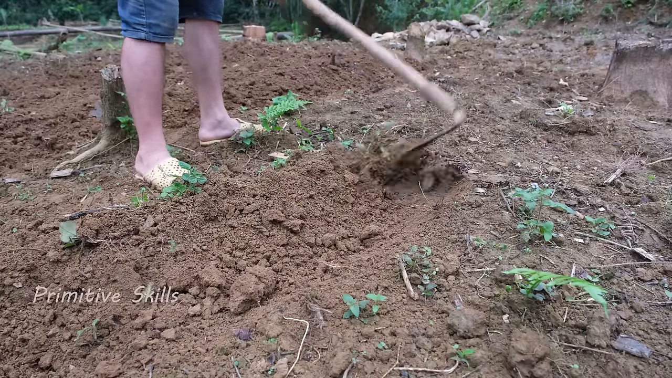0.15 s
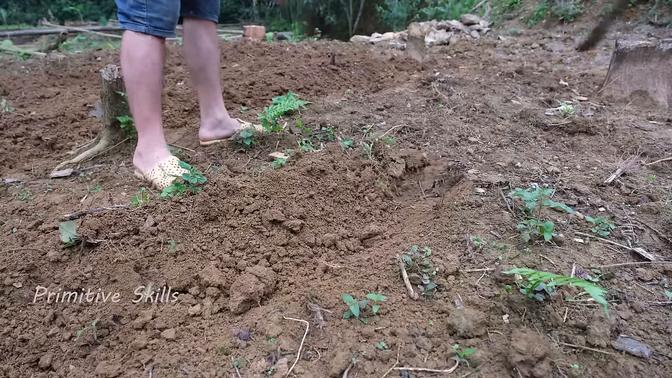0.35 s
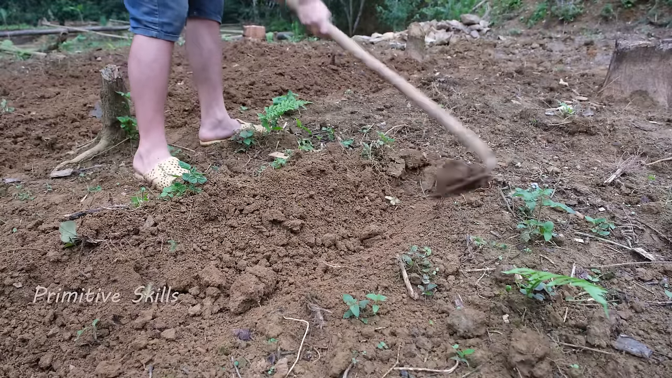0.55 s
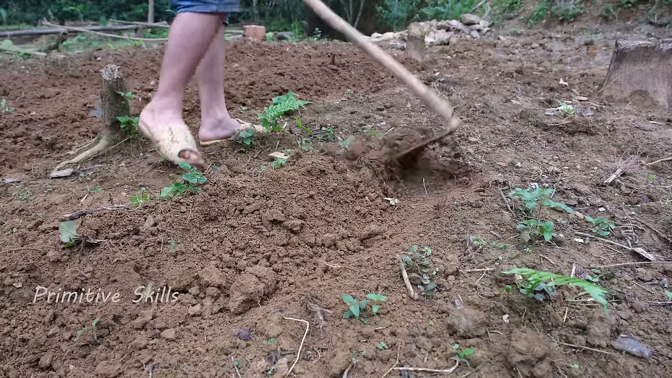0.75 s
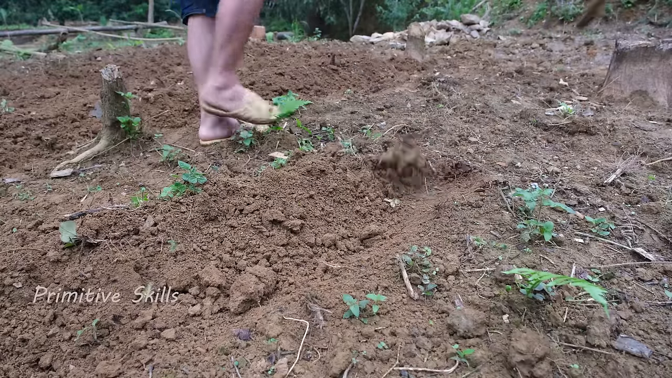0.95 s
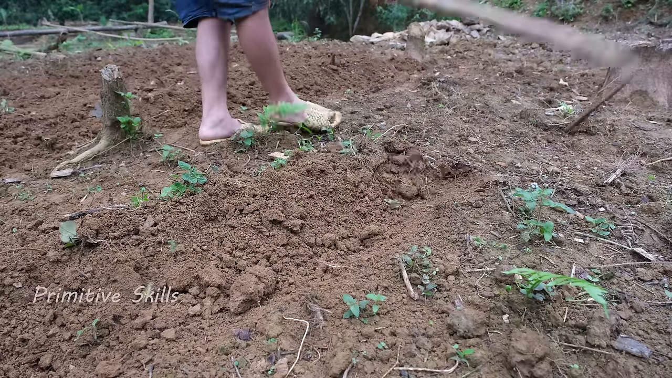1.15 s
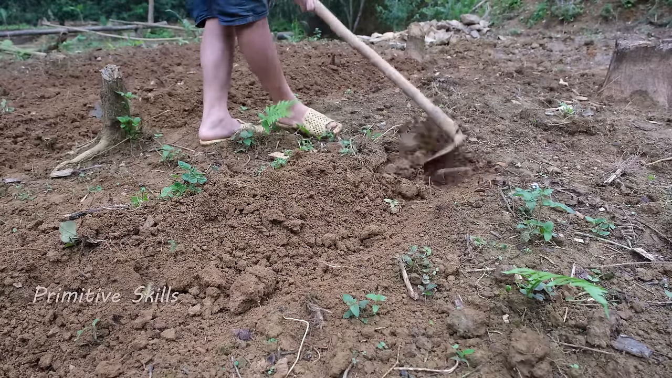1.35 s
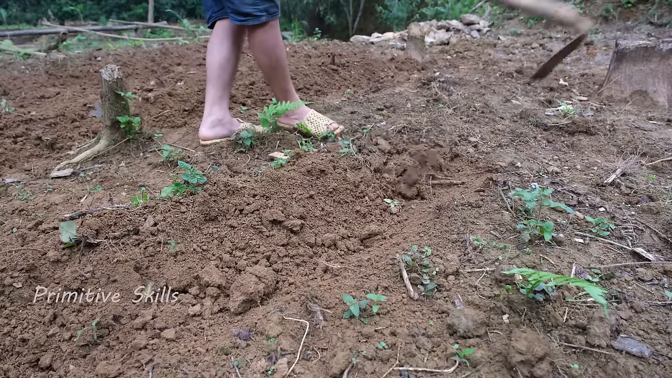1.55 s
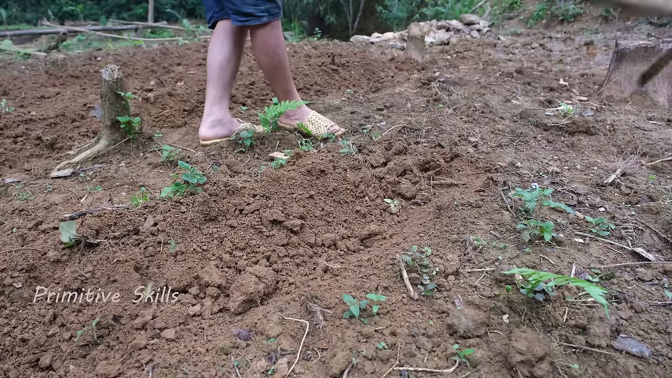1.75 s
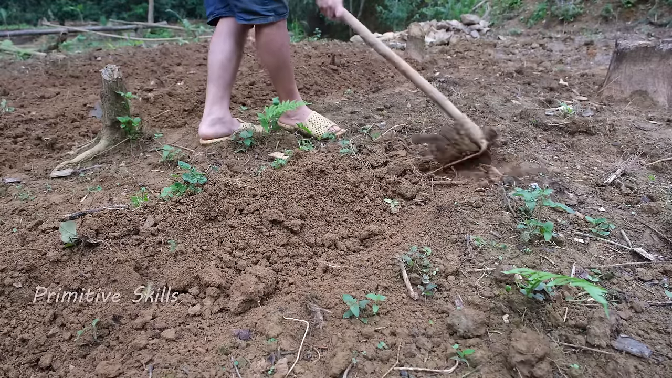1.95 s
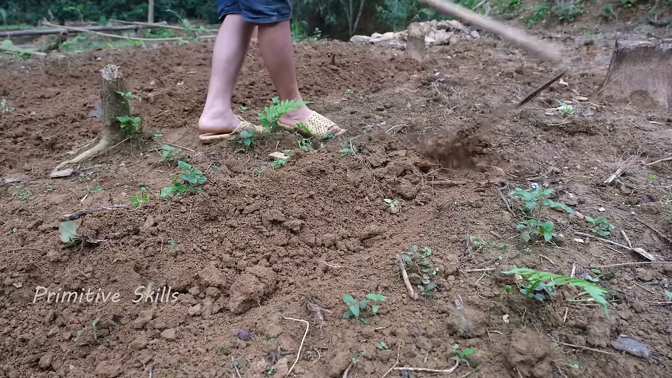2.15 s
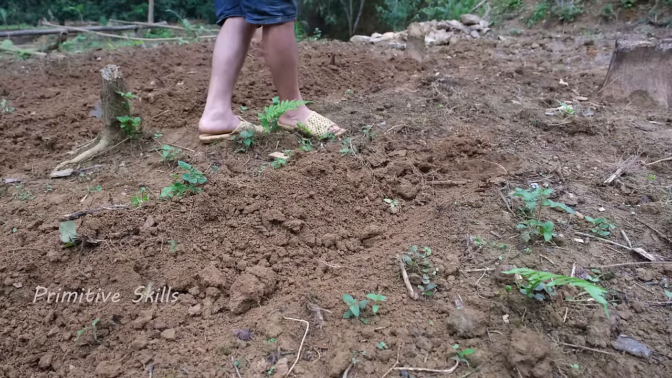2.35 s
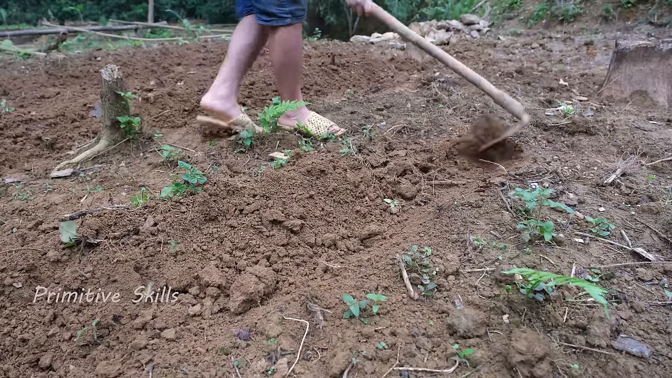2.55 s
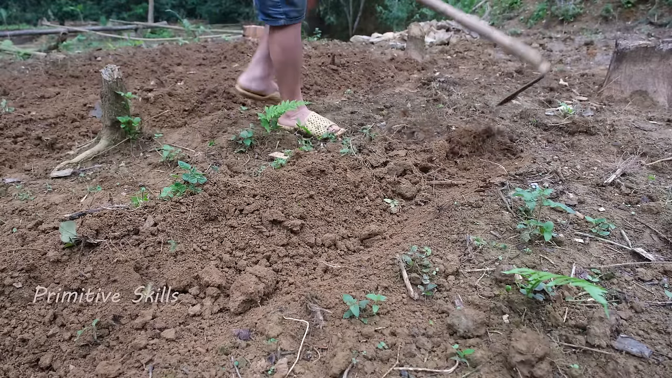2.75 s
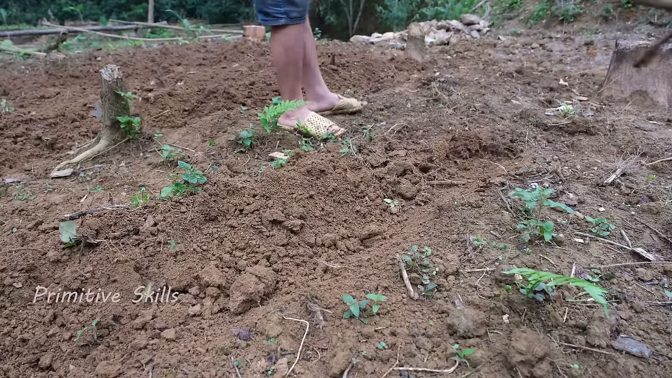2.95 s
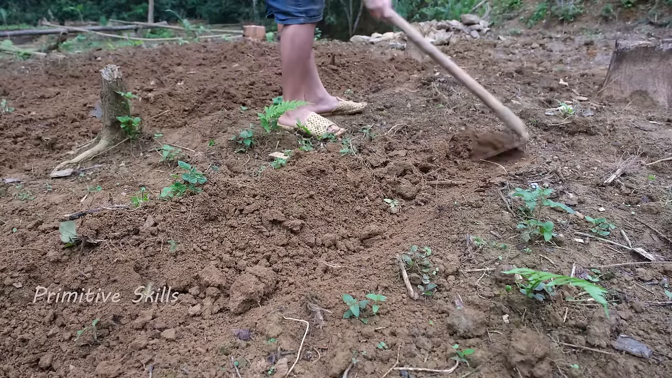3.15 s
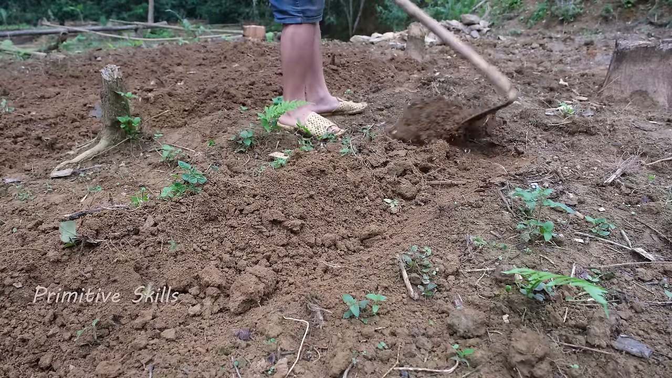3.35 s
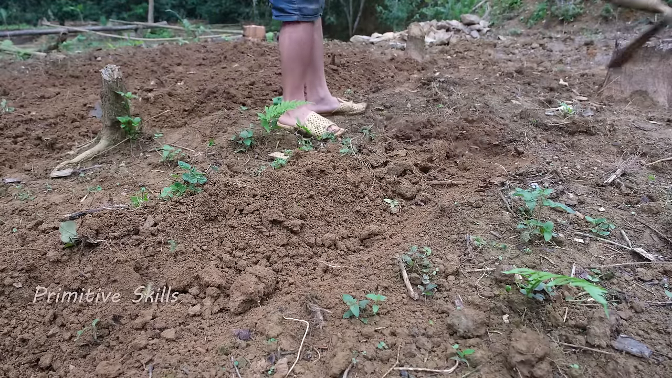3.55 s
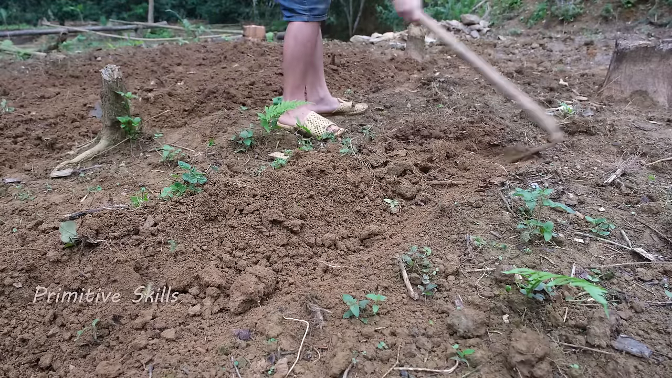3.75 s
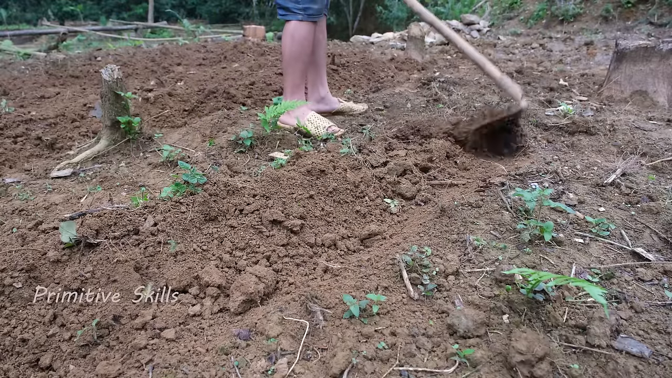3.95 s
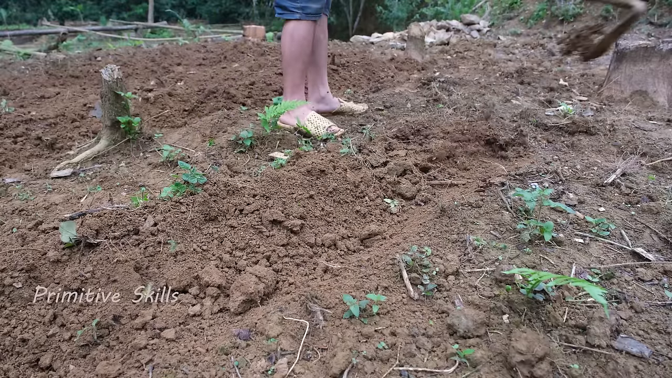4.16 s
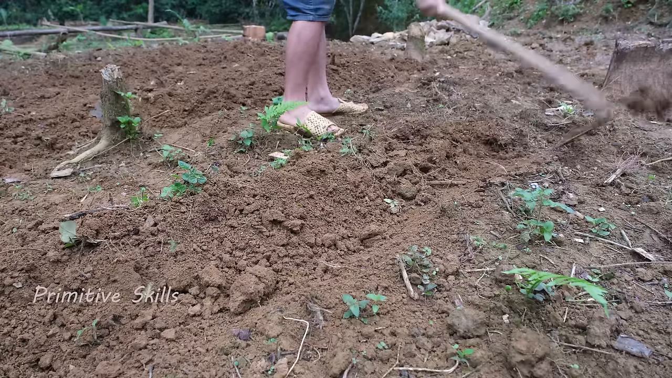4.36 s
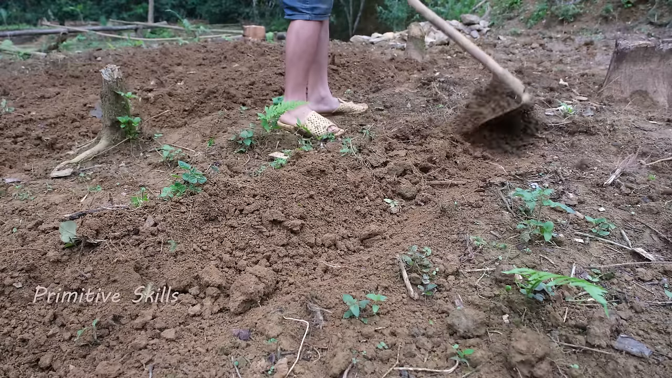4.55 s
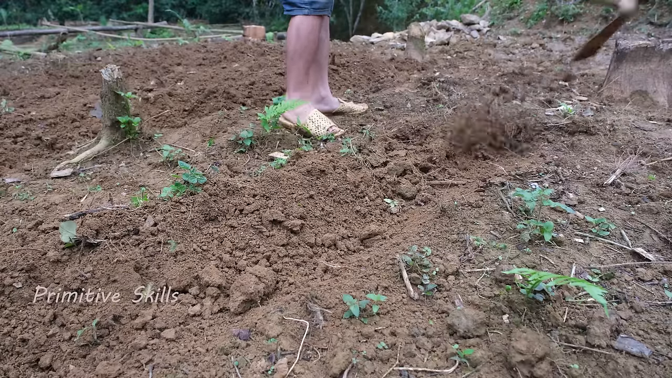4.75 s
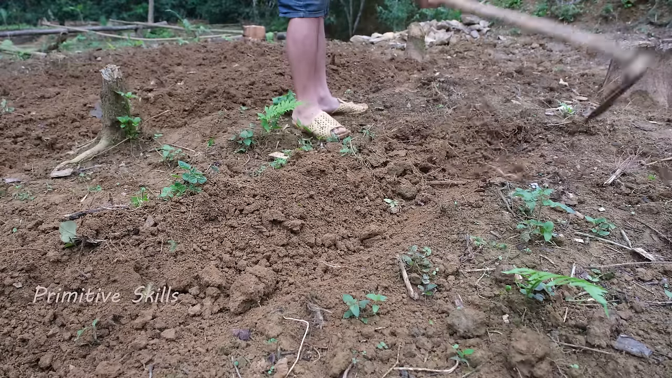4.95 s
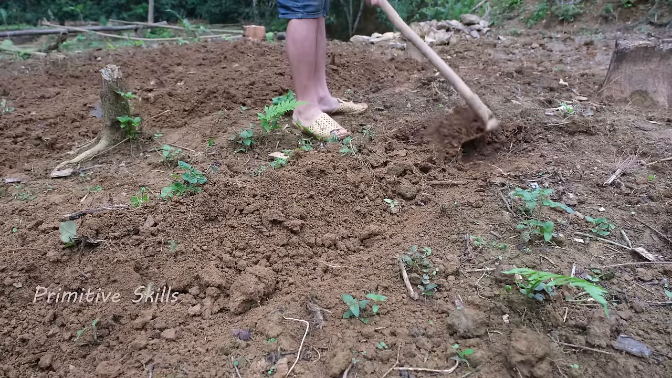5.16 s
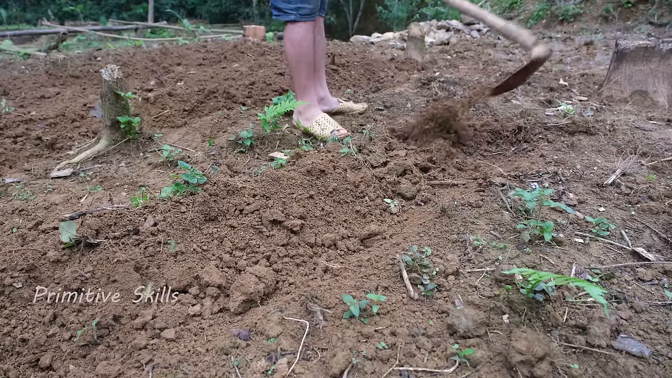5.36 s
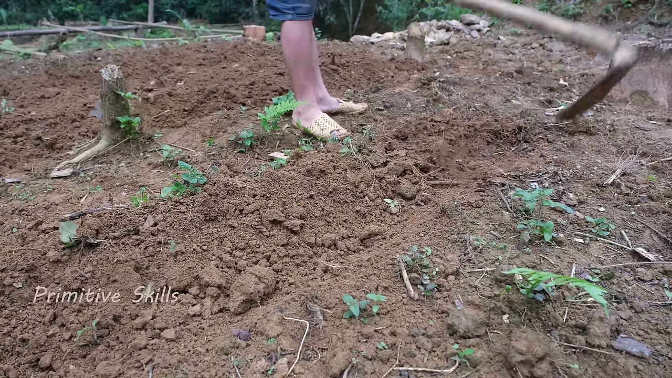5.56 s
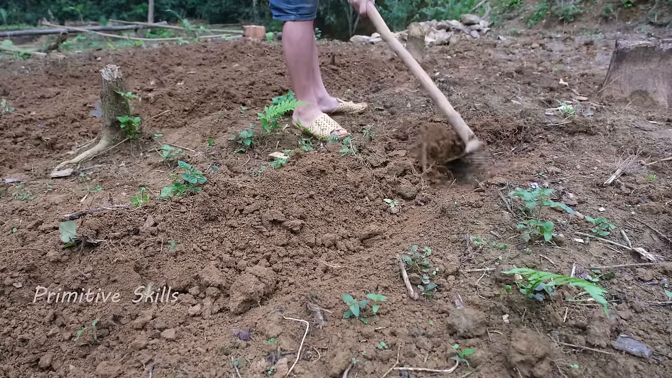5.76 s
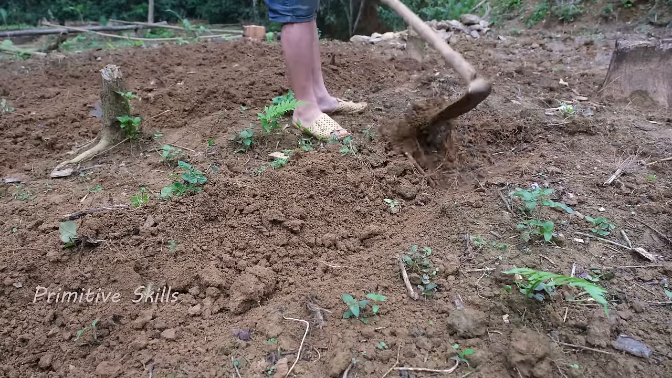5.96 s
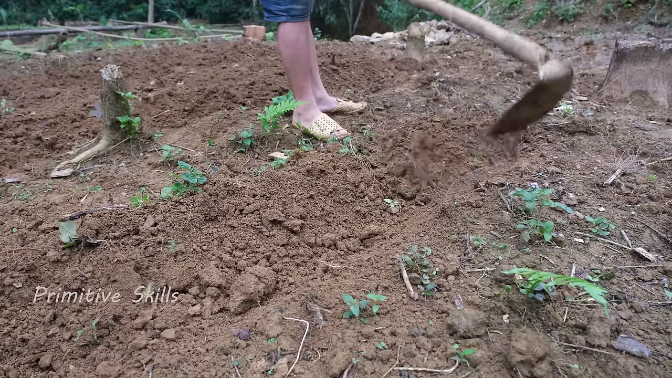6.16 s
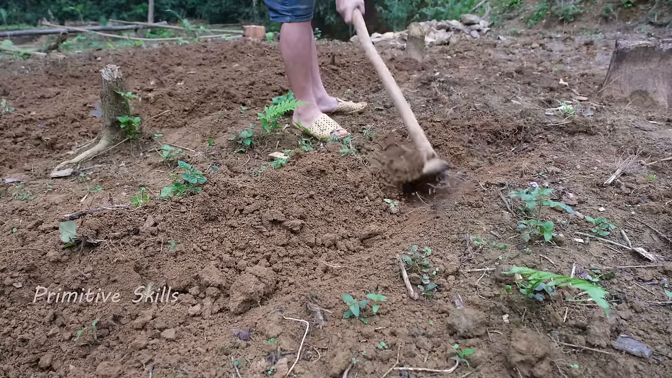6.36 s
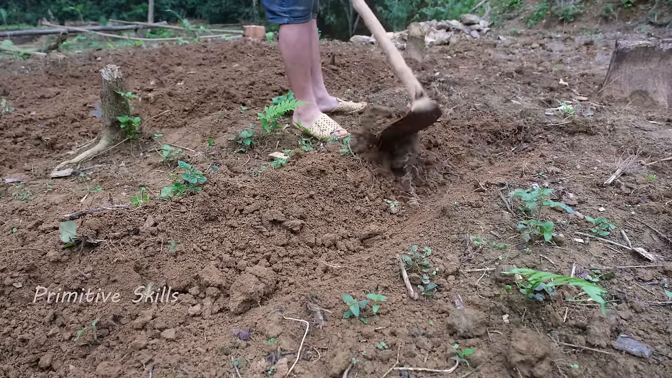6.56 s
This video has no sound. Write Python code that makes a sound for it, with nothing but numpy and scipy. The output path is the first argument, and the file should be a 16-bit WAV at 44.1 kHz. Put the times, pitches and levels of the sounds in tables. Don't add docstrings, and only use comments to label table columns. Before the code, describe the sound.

A quiet rural field: faint leaves, running water and insects blur into a soft, steady murmur. At the start, crumbs from an earlier blow settle near the microphone. From about 0.6 seconds a hand hoe chops dry, clumpy earth a few steps away, landing near 0.6, 1.25, 1.9, 2.5, 3.2, 3.8, 4.4, 5.1, 5.7 and 6.3 seconds. Each strike has a brief gritty crunch, cracking clods and a short muffled thud with low ground shudder, then a light patter of pebbles and dirt. The crack at 3.8 is sharpest; those at 2.5 and 5.1 are duller. A small bird trills rapidly and faintly around 2.8 to 3.1, calling weakly again near 6.5. The blade scrapes briefly at 2.0 and 5.8. A stone knocks it hard at 4.46, with a softer knock at 5.17. Dry, centred, with barely any echo.

```python
import sys
import numpy as np
from scipy import signal
from scipy.io import wavfile
from scipy.ndimage import uniform_filter1d

SR = 44100
rng = np.random.default_rng(int(sys.argv[2]) if len(sys.argv) > 2 else 0)


def linear_from_db(decibels):
    return 10 ** (np.asarray(decibels, float) / 20)


def file_out(sig):
    cols = np.atleast_2d(sig).T
    lim = np.clip(cols, -1, 1)
    pcm = np.round(lim * 32767).astype(np.int16)
    wavfile.write(sys.argv[1], SR, pcm)


N = 291060
BURST = 1540


def rms_one(x):
    return x / np.sqrt(np.mean(x ** 2) + 1e-20)


def peak_one(x, size):
    power = uniform_filter1d(x ** 2, size=size, axis=-1)
    return x / np.sqrt(power.max(axis=-1, keepdims=True) + 1e-20)


def band(x, low_hz, high_hz, order=2):
    edges = np.clip([low_hz, high_hz], 10, .45 * SR)
    return signal.sosfilt(signal.butter(order, edges, "band", fs=SR, output="sos"), x)


def resonance(x, hz, width_hz):
    r = np.exp(-np.pi * width_hz / SR)
    turn = 2 * r * np.cos(2 * np.pi * hz / SR)
    return signal.lfilter([(1 - r * r) / 2, 0, (r * r - 1) / 2], [1, -turn, r * r], x)


def drift(rate):
    r = np.exp(-80 * np.pi * rate / SR)
    slow = signal.lfilter([1], [1, -2 * r, r * r], rng.standard_normal(N // 40 + 2002))[2000:]
    return np.interp(np.arange(N) / 40, np.arange(len(slow)), rms_one(slow))


def add(out, start_s, sound):
    i = max(round(start_s * SR), 0)
    out[i:i + len(sound)] += sound[:max(N - i, 0)]


def puffs(rise_s, fall_s, tail_db, tail_s):
    t = np.arange(BURST) / SR
    fall = np.exp(-t / fall_s[:, None]) + linear_from_db(tail_db) * np.exp(-t / tail_s)
    shape = (1 - np.exp(-t / rise_s)) * fall
    return rng.standard_normal(shape.shape) * shape


# (frequency [Hz], density [dB per Hz])
MURMUR = [(30, -51), (105, -10), (185, -6), (290, -4), (500, -8.5), (700, -5.5), (870, -4), (1250, -10.5),
          (2800, -15.5), (3900, -17.5), (5600, -23), (7600, -32.5), (14300, -36), (16500, -45)]


def leaves_and_water(patchy_db, shared_db):
    hz, db = np.transpose(MURMUR)
    edges = 40 * 2 ** np.arange(0, 8.8, 1 / 3)
    white = rng.standard_normal((2, N))
    out, together = 0, drift(3)
    for k, (low, high) in enumerate(zip(edges, edges[1:])):
        level_db = np.interp(np.log(low * high) / 2, np.log(hz), db)
        flicker_db = shared_db * together + patchy_db * drift(22)
        out = out + linear_from_db(level_db + flicker_db) * band(white[k % 2], low, high)
    return linear_from_db(-61.58) * rms_one(out)


# (pitch [Hz], width [Hz], level [dB])
WATER_NOTE = (873, 114, -71.5)


def stream():
    hz, width_hz, level_db = WATER_NOTE
    note = resonance(resonance(rng.standard_normal(N), hz, width_hz), hz, width_hz)
    return linear_from_db(level_db + 2 * drift(5)) * rms_one(note)


def air():
    return linear_from_db(-93.5) * rms_one(band(rng.standard_normal(N), 15, 45))


# (pitch [Hz], width [Hz], level [dB])
STEADY_BAND = (3470, 480, -79)


def steady_band():
    hz, width_hz, level_db = STEADY_BAND
    hush = resonance(resonance(rng.standard_normal(N), hz, width_hz), hz, width_hz)
    return linear_from_db(level_db + drift(3)) * rms_one(hush)


# (time [s], peak [dB])
TRILL_NOTES = [
    (2.7995, -55.5),
    (2.8584, -54),
    (2.9183, -54),
    (2.9776, -54.5),
    (3.039, -54.5),
    (3.0944, -53),
    (3.265, -62),
    (3.33, -62),
    (6.46, -62),
    (6.56, -61),
]
# (time [s], pitch [Hz], level [dB])
CHIRP = [
    (0, 3000, -14),
    (.004, 3450, 0),
    (.009, 3600, -1),
    (.012, 3950, -8),
    (.021, 4250, -17),
]


def bird():
    out, (s, hz, db) = np.zeros(N), np.transpose(CHIRP)
    t = np.arange(round(s[-1] * SR)) / SR
    for (start, peak_db), bend in zip(TRILL_NOTES, rng.normal(1, .01, len(TRILL_NOTES))):
        phase = 2 * np.pi * np.cumsum(bend * np.interp(t, s, hz)) / SR
        note = linear_from_db(peak_db - 2 + np.interp(t, s, db)) * np.sin(phase)
        add(out, start - .004, note)
        add(out, start + .074, linear_from_db(-31) * note)
    decay = np.arange(12000) / SR
    trees = rng.standard_normal(len(decay)) * linear_from_db(-60 * decay / .4)
    return out * linear_from_db(1.2 * drift(150)) + linear_from_db(-36) * signal.fftconvolve(out, trees)[:N]


# (time [s], length [s], patter [dB], fine dust [dB])
SHOWERS = [(0, 0.088, -68, -75), (0.576, 0.1, -60.5, -82), (0.922, 0.21, -68, -75.5),
           (1.271, 0.096, -58, -72), (1.494, 0.18, -72.5, -84), (1.913, 0.11, -64, -78),
           (1.997, 0.091, -62, -72), (2.135, 0.2, -68, -81), (2.54, 0.12, -71, -78), (2.8, 0.17, -70, -88),
           (3.172, 0.13, -69, -79), (3.394, 0.19, -70, -88), (3.798, 0.13, -66.5, -79),
           (4.456, 0.11, -70, -74.5), (5.076, 0.088, -70, -81), (5.706, 0.06, -73, -77),
           (5.769, 0.1, -62.5, -70.5), (6.25, 0.12, -69, -74)]


def loose_dirt():
    sizes = linear_from_db(3.4 * np.minimum(rng.exponential(1, N), 5)) * rng.choice([-1, 1], N)
    grains_per_s = 2400 * linear_from_db(4 * drift(60))
    grains = sizes * (rng.random(N) < grains_per_s / SR)
    dealt = rng.integers(0, 12, N)
    rings = 0
    for k, hz in enumerate(np.geomspace(2200, 5900, 12)):
        rings = rings + resonance(grains * (dealt == k) + 1e-18, hz, .12 * hz)
    patter = band(rings, 2000, 6200)
    dust = band(grains + 2 * rng.standard_normal(N) * grains.std(), 6500, 15500, order=3)
    out = np.zeros(N)
    for start, length_s, patter_db, dust_db in SHOWERS:
        span = slice(max(round(start * SR), 0), round((start + length_s) * SR))
        swell = signal.windows.tukey(span.stop - span.start, .7)
        out[span] += swell * linear_from_db(patter_db) * rms_one(patter[span])
        out[span] += swell * linear_from_db(dust_db) * rms_one(dust[span])
    return out


# (time [s], ground shudder [dB], shudder held [s], first crumb [dB], crumbs fall for [s])
BLOW_EFFECTS = [(-.02, -54, 0.026, -52, 0.037), (.574, -57, 0.079, -45, 0.095),
                (1.253, -55, 0.043, -43.5, .05), (1.893, -60, 0.093, -51, .1),
                (2.526, -58.5, 0.082, -45, .05), (3.165, -59.5, 0.078, -42.5, .04),
                (3.796, -64.5, 0.1, -49.5, .03), (4.428, -65, 0.1, -48.5, .09),
                (5.068, -61, 0.074, -54, 0.033), (5.702, -58, 0.043, -50.5, 0.12),
                (6.333, -60.5, 0.063, -52, 0.033)]


def shudder():
    t, level_db = np.arange(N) / SR, -88
    for s, peak_db, held_s, *_ in BLOW_EFFECTS:
        shape_db = np.interp(t - s, [-.022, 0, held_s, held_s + 1], [-40, .5, 0, -155])
        level_db = np.maximum(level_db, peak_db + shape_db)
    wave = band(resonance(rng.standard_normal(N), 60, 46), 35, 107)
    even = wave / np.sqrt(uniform_filter1d(wave ** 2, size=2400) + 1e-12)
    return 1.3 * resonance(linear_from_db(level_db - 2.9) * even, 61, 80)


# (time [s], length [s], level, 6 dB above that at the
# end [dB], hiss [Hz])
SCRAPES = [
    (2.005, 0.067, -58, 5170),
    (5.785, .063, -57, 4500),
]


def drags():
    swell_db, width_hz = 3, 1500
    out = np.zeros(N)
    grit = rng.standard_normal(N) * linear_from_db(3 * drift(200))
    for s, length_s, level_db, hz in SCRAPES:
        t = np.arange(round(length_s * SR)) / SR
        rub = resonance(grit[round(s * SR):][:len(t)], hz, width_hz)
        rub = resonance(rub, hz, 2 * width_hz)
        swell = linear_from_db(level_db - swell_db * (3 - t / length_s)) * np.minimum(t / .014, 1)
        add(out, s, swell * rms_one(rub))
    return out


# (time [s], peak [dB], pitch [Hz], second pitch [Hz])
STONES = [
    (.7457, -52.5, 2490, 1500),
    (2.0646, -50.5, 2300, 5000),
    (4.4585, -27.5, 1630, 844),
    (4.464, -33.5, 1550, 3000),
    (5.169, -38, 2590, 1720),
    (5.7608, -47, 1650, 1000),
]


def knocks():
    width_hz = 220
    out = np.zeros(N)
    touches = puffs(.002, np.full(len(STONES), .002), -34, .007)
    for touch, (s, peak_db, hz, second_hz) in zip(touches, STONES):
        ring = resonance(touch, hz, width_hz) - .67 * resonance(touch, second_hz, width_hz)
        dry_contact = linear_from_db(-18) * band(touch, 410, 4000)
        grit = linear_from_db(-30) * band(touch, 7300, 14400)
        add(out, s - .003, linear_from_db(peak_db) * peak_one(ring + dry_contact + grit, size=80))
    return out


# (time [s], peak [dB], pitch [Hz], time to fall 60 dB [s])
BLADE_STOPS = [(0.574, -32.5, 231, 0.078), (1.252, -36, 138, 0.058), (1.897, -41, 350, 0.19),
               (2.525, -43.5, 161, 0.24), (3.164, -41.5, 262, 0.12), (3.798, -41.5, 211, 0.099),
               (4.425, -36, 260, 0.13), (4.517, -46, 276, 0.098), (5.064, -42.5, 173, 0.13),
               (5.704, -42.5, 240, 0.12), (6.333, -37.5, 204, 0.1), (6.419, -42, 500, 0.018),
               (2.949, -49, 425, 0.03)]


def thuds():
    out, t = np.zeros(N), np.arange(6000) / SR
    noise = rng.standard_normal((len(BLADE_STOPS), len(t)))
    for push, (s, peak_db, hz, t60) in zip(noise, BLADE_STOPS):
        push = push * (1 - np.exp(-t / .002)) * linear_from_db(-60 * t / t60)
        low = band(push, 130, max(370, 1.5 * hz))
        add(out, s - .002, linear_from_db(peak_db - 5) * peak_one(low + resonance(low, hz, 54), size=300))
    return out


# (time of the bite [s], lead [s], level at the bite [dB], brightness [Hz])
GRINDS = [
    (0.58, 0.0079, -35.5, 3000),
    (1.2567, 0.0067, -32, 2500),
    (3.1702, 0.013, -35.5, 4000),
    (3.798, 0.0071, -40, 1780),
    (4.4315, .006, -37, 3020),
    (5.068, .003, -42, 2500),
    (5.705, 0.022, -48, 3470),
    (6.336, .015, -44, 2500),
]


def entries():
    out, t = np.zeros(N), np.arange(BURST) / SR
    noises = rng.standard_normal((len(GRINDS), BURST))
    for noise, (s, lead_s, level_db, top_hz) in zip(noises, GRINDS):
        swell = linear_from_db(np.interp(t, [0, lead_s, lead_s + .004], [-9.5, 0, -40]))
        add(out, s - lead_s, linear_from_db(level_db) * swell * rms_one(band(noise, 500, top_hz)))
    return out


def breaks(rows, length_s, ring_share, tail_db, click):
    out = np.zeros(N)
    snaps = puffs(.0003, length_s, tail_db, .007)
    snaps[:, 12] += click
    pushes = puffs(.00049, .003 + .78 * length_s, tail_db + 9.5, .013)
    pushes[:, 24] += 1.18 * click
    body = band(pushes, 480, 1800)
    body = peak_one(body + 1.3 * resonance(body, 785, 120), size=160)
    grit = band(puffs(.0001, .61 * length_s, tail_db + 5, .007), 7600, 13800)
    grit = peak_one(grit, size=60)
    port = signal.butter(4, 6600, fs=SR, output="sos")
    for k, (s, crack_db, ring_hz, body_db, grit_db, *_) in enumerate(rows):
        wide = resonance(snaps[k], 1.22 * ring_hz, 1.21 * ring_hz)
        wide = signal.sosfilt(port, resonance(wide, 1630, 3970))
        ring = resonance(wide, ring_hz, .059 * ring_hz)
        add(out, s - .0009, linear_from_db(crack_db + .36) * peak_one(ring_share * ring + wide, size=50))
        add(out, s - .0018, linear_from_db(body_db + 1) * body[k])
        add(out, s - .0009, linear_from_db(grit_db - 5) * grit[k])
    return out


def crumbs(count):
    delay_s, fade_db, scatter_db = .016, -13, .5
    lowest_hz, octaves = 1500, 1.86
    s, _, _, first_db, fall_s = np.transpose(BLOW_EFFECTS)[:, :, None]
    chances = rng.random((len(BLOW_EFFECTS), count, 5))
    place, pitch, size, body, grit = np.moveaxis(chances, -1, 0)
    late = (np.arange(count) + place) / count
    crack_db = first_db + fade_db * late + scatter_db * (2 * size - 1)
    body_db = crack_db - 3 + 2 * scatter_db * (2 * body - 1)
    grit_db = crack_db - 6.5 + 2 * scatter_db * (2 * grit - 1)
    rows = [s + delay_s + late * fall_s, crack_db, lowest_hz * 2 ** (octaves * pitch), body_db, grit_db]
    return np.reshape(rows, (len(rows), -1)).T.tolist()


# (time [s], crack [dB], ring [Hz], earthy body [dB])
LANDINGS = [(0.0782, -48, 3000, -50.5), (0.57, -51, 2930, -52), (0.67, -51, 2600, -63),
            (0.62, -53, 3270, -63), (.8605, -60, 1590, -59), (1.1, -57, 4310, -60),
            (1.3269, -42, 3700, -48), (1.3328, -52, 4100, -67), (1.9556, -39, 2400, -43),
            (1.9838, -59, 3360, -56), (1.9903, -49.5, 2330, -52.5), (0.692, -56.5, 3200, -75),
            (0.61, -43.5, 3640, -57), (2.5608, -50, 1590, -54), (2.8834, -58, 2910, -70),
            (3.2057, -41.5, 2900, -63), (1.2373, -54.5, 3500, -72), (3.1956, -42.5, 3600, -65),
            (4.384, -73, 1490, -55), (4.4971, -69, 1510, -52), (4.537, -56, 3100, -60),
            (5.0951, -48, 1640, -46.5), (5.1026, -56, 1850, -55), (2.5697, -57, 2900, -64),
            (5.7322, -55, 3360, -55), (5.7413, -60, 2370, -55), (6.3676, -55, 5700, -55),
            (5.7984, -65, 2410, -54), (5.976, -62, 1700, -59.5), (6.4195, -51, 4300, -46)]


def pebbles_and_crumbs():
    rows = [(*row, row[1] - 8) for row in LANDINGS] + crumbs(count=7)
    return breaks(rows, np.full(len(rows), .0016), ring_share=2.2, tail_db=-17, click=4)


# (time [s], crack [dB], ring [Hz], earthy body [dB], grit [dB])
EDGE_BITES = [
    (0.5783, -29, 4700, -32.5, -37),
    (1.2559, -28.5, 3350, -32.5, -34.5),
    (1.8952, -30.5, 4840, -41.5, -25.5),
    (2.5291, -34.5, 1440, -35.5, -35.5),
    (3.1703, -24.5, 2200, -36.5, -32.5),
    (3.7987, -16.5, 3380, -33.5, -26.5),
    (4.433, -27.5, 3290, -32.5, -31),
    (5.0687, -36.5, 1466, -40.5, -40),
    (5.7054, -30, 4840, -34, -35.5),
    (6.337, -45, 1640, -36, -64),
]
# (time [s], crack [dB], ring [Hz], earthy body [dB], grit [dB])
BURSTING_CLODS = [(0.5837, -43, 1630, -37, -40), (0.589, -28.5, 2900, -50, -41),
                  (0.6111, -39.5, 2350, -40.5, -49), (1.264, -24.5, 5420, -30.5, -34.5),
                  (1.2834, -40, 3160, -53, -41), (1.9, -36.5, 2350, -42, -34),
                  (1.9111, -42, 1700, -38, -43), (1.9204, -35.5, 3280, -36, -41),
                  (2.5349, -35.5, 2090, -42.5, -39.5), (2.54, -37.5, 2410, -45, -53),
                  (2.5452, -38, 2970, -49, -43), (3.186, -51, 3200, -64, -50),
                  (3.1759, -44, 1720, -51, -60), (3.1916, -42.5, 4950, -50, -41),
                  (4.4391, -41, 4820, -44, -60), (4.4441, -40, 1510, -44, -46),
                  (4.4514, -38, 3080, -31.5, -58), (1.277, -41, 2570, -53, -51),
                  (1.9064, -46, 2110, -39, -54), (5.0735, -36.5, 1510, -39, -54),
                  (5.0777, -33, 3500, -39.5, -39), (5.713, -32.5, 2880, -53, -51),
                  (6.3316, -51, 3150, -51, -47), (6.342, -37.5, 2920, -71, -43.5)]


def bites_and_clods():
    bite_s, clod_cycles = .0024, 8
    length_s = [bite_s] * len(EDGE_BITES) + [clod_cycles / row[2] for row in BURSTING_CLODS]
    return breaks(EDGE_BITES + BURSTING_CLODS, np.array(length_s), ring_share=3.5, tail_db=-21, click=5)


def scene():
    far = leaves_and_water(patchy_db=.6, shared_db=.15) + stream() + air() + steady_band() + bird()
    ground = loose_dirt() + shudder() + thuds()
    blade = drags() + knocks() + entries()
    mono = far + ground + blade + pebbles_and_crumbs() + bites_and_clods()
    return np.array([mono, mono])


def band_limit(x):
    return signal.sosfilt(signal.butter(12, 16680, fs=SR, output="sos"), x)


def record(dry):
    rounded = .27 * np.tanh(dry / .27)
    noisy = rounded + linear_from_db(-78) * band(rng.standard_normal(dry.shape), 3600, 16000, order=1)
    mix = signal.sosfilt(signal.cheby2(10, 60, 16800, fs=SR, output="sos"), noisy)
    return band_limit(mix)


dry = scene()
out = record(dry)
file_out(out)
```